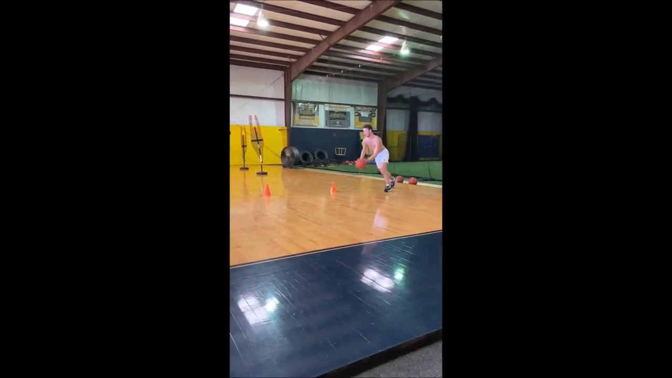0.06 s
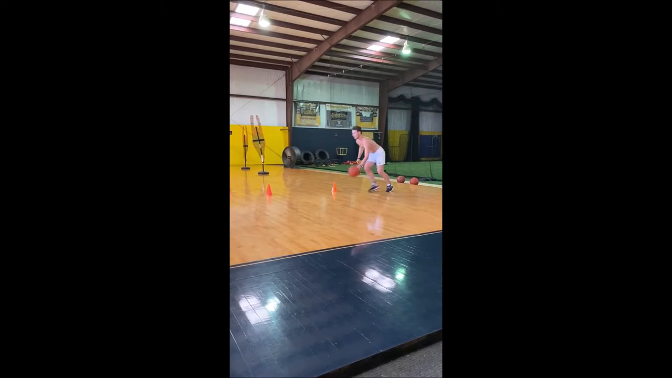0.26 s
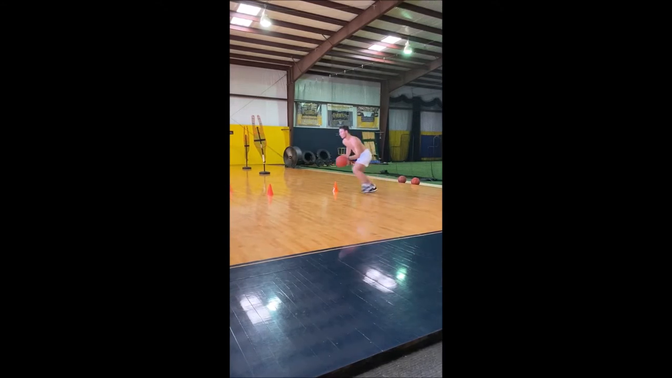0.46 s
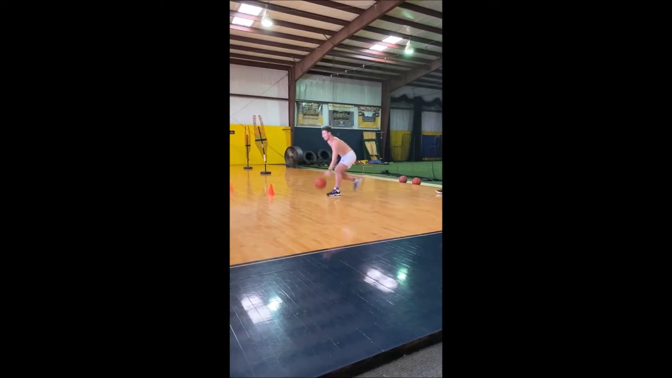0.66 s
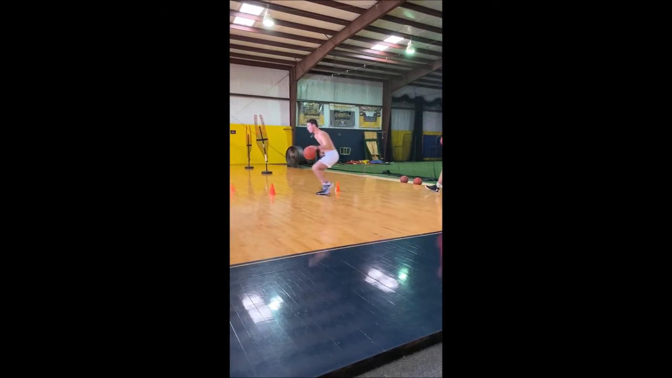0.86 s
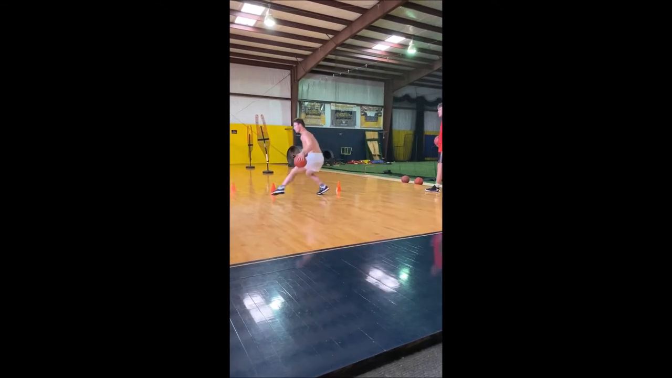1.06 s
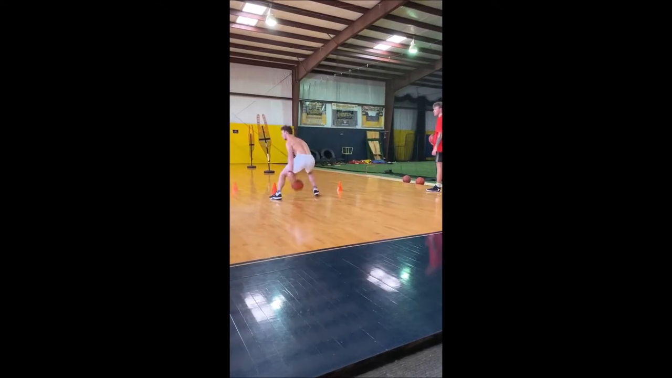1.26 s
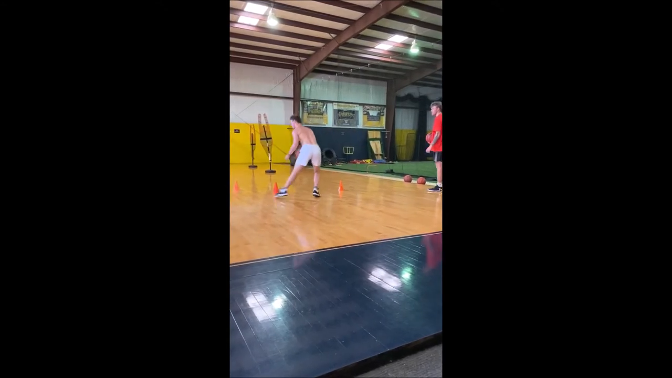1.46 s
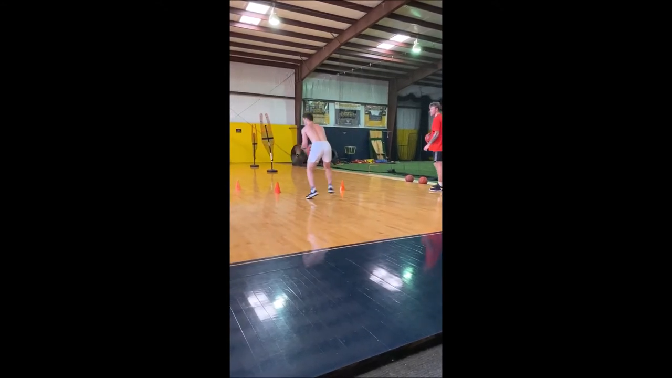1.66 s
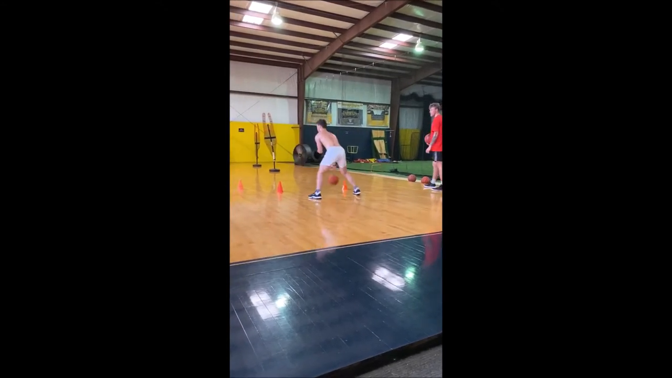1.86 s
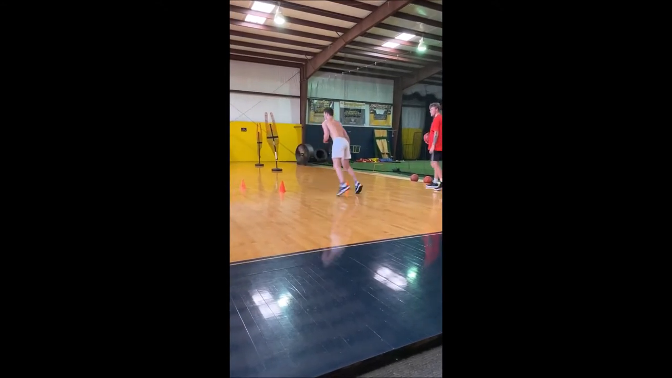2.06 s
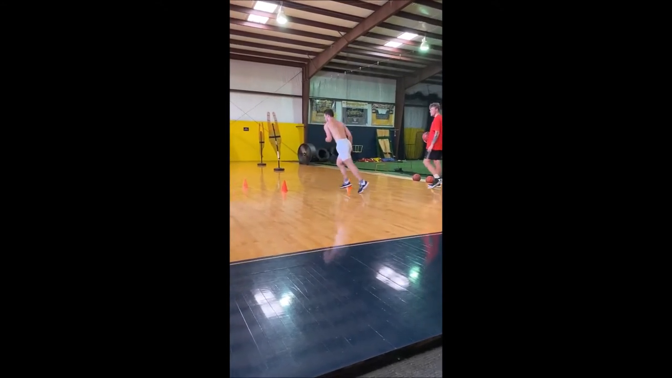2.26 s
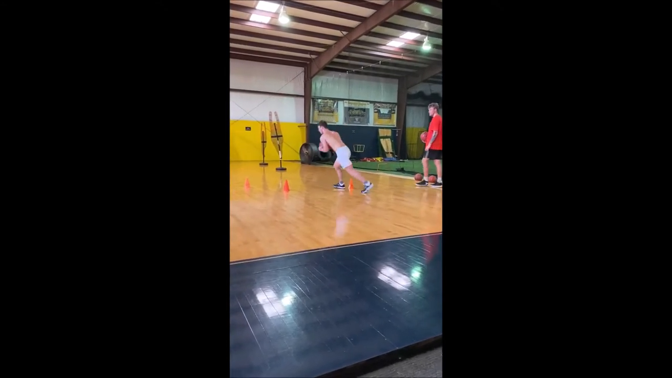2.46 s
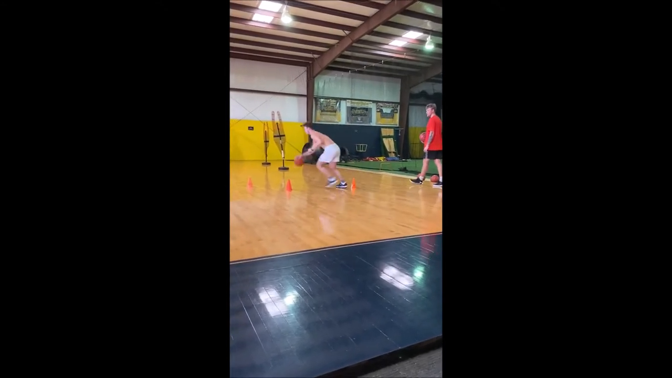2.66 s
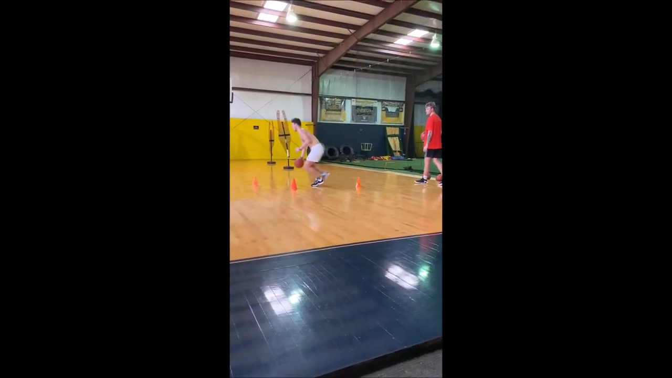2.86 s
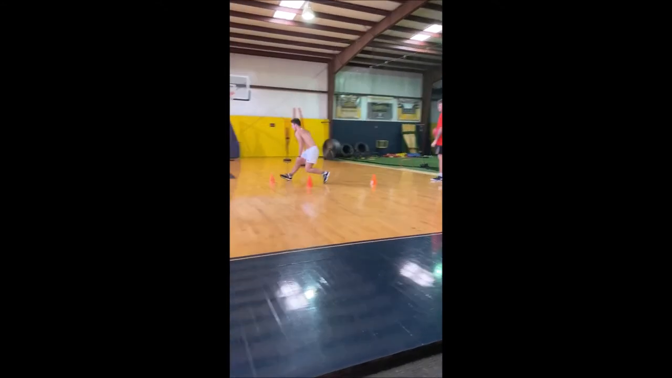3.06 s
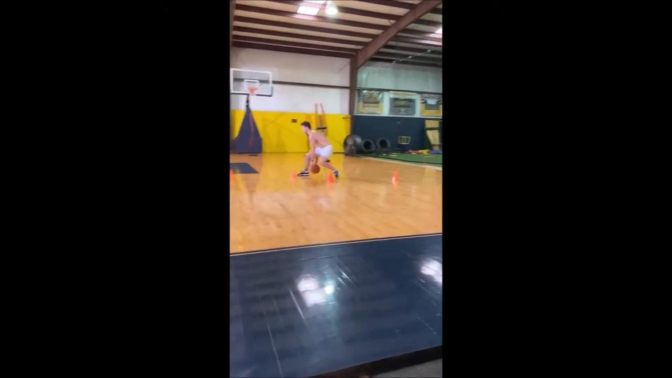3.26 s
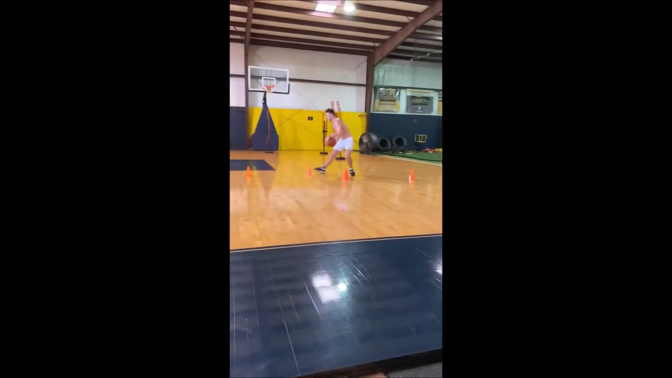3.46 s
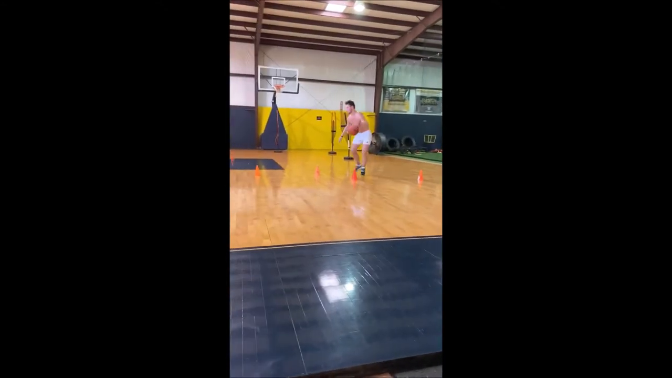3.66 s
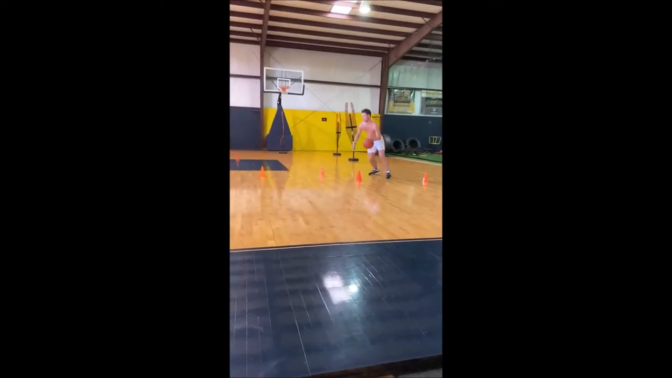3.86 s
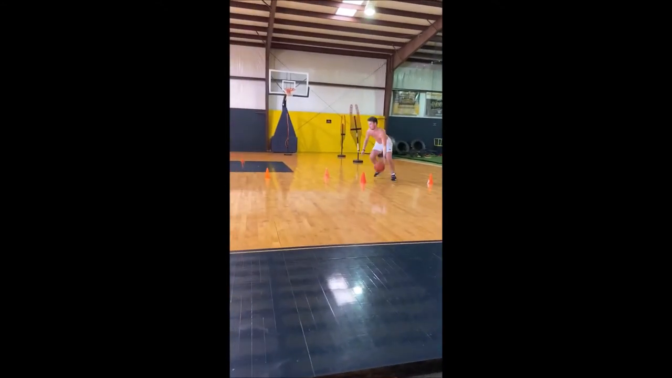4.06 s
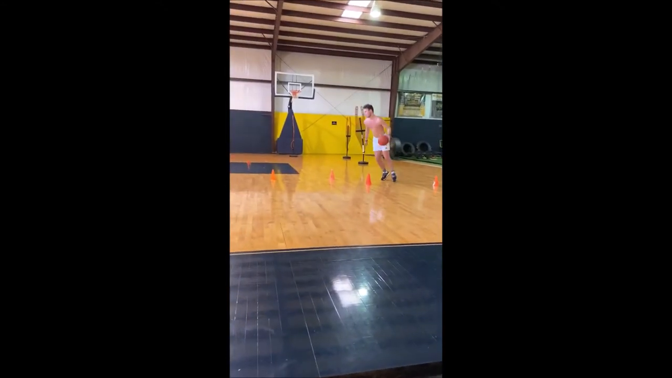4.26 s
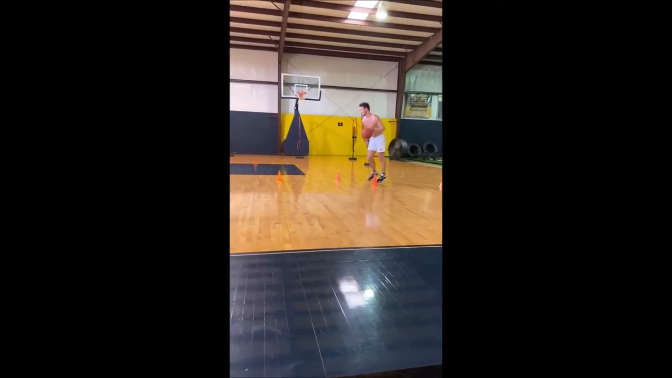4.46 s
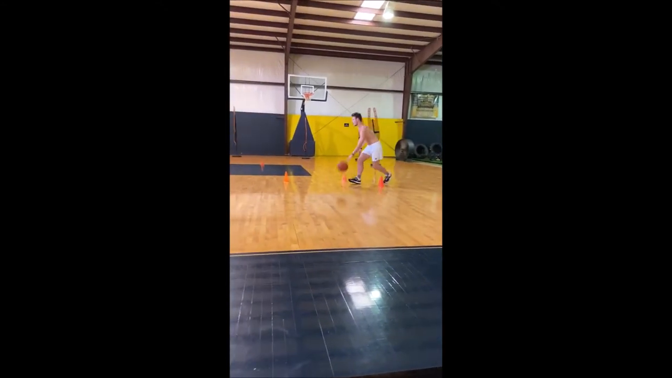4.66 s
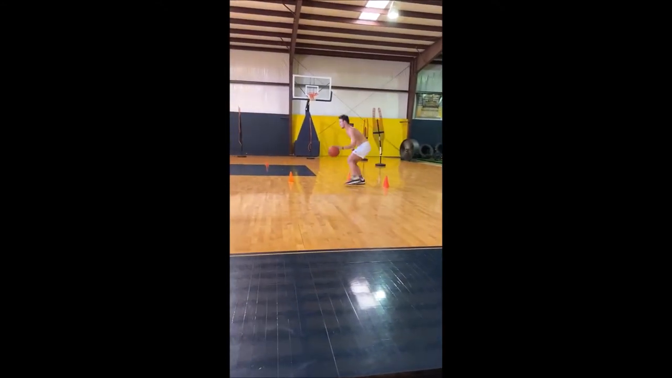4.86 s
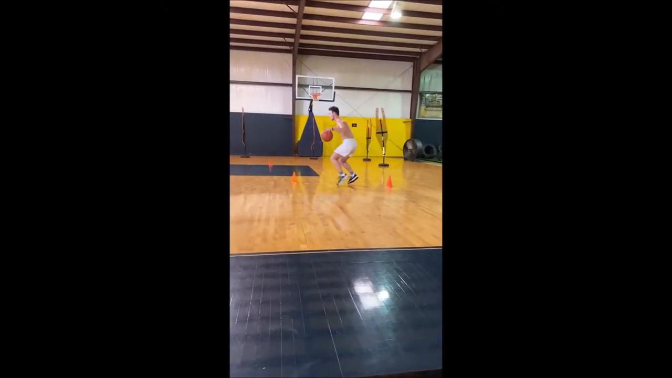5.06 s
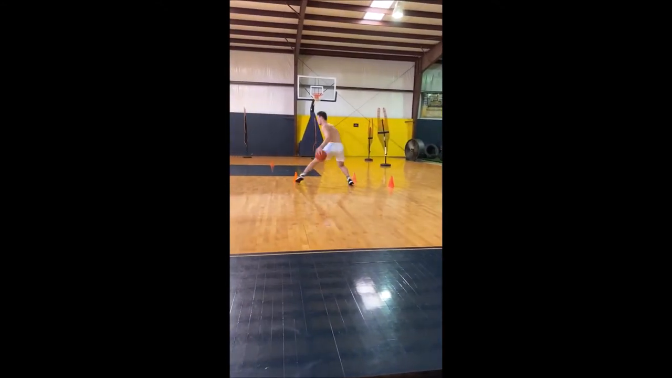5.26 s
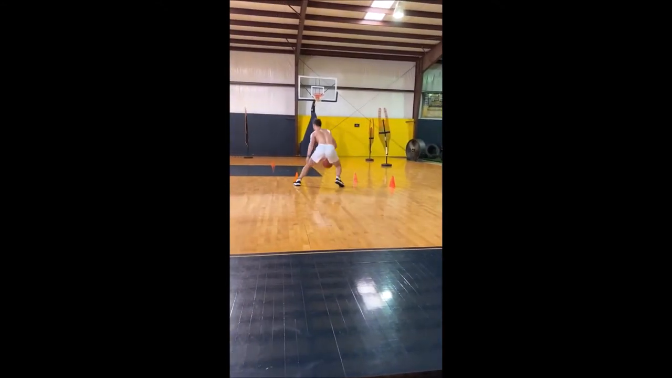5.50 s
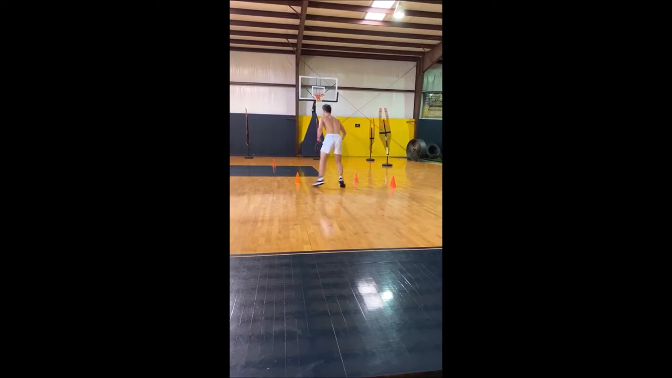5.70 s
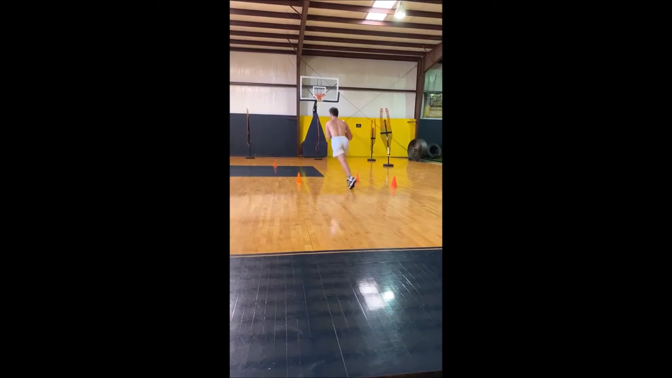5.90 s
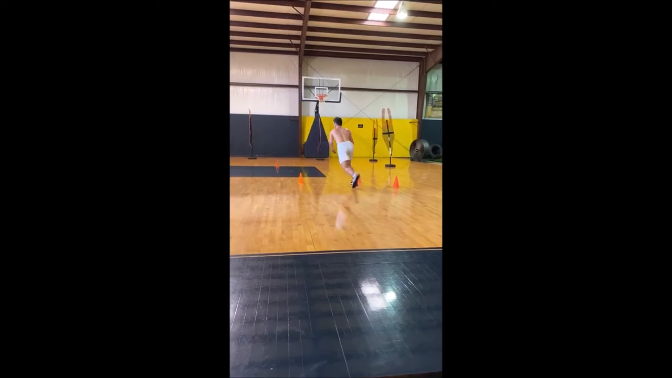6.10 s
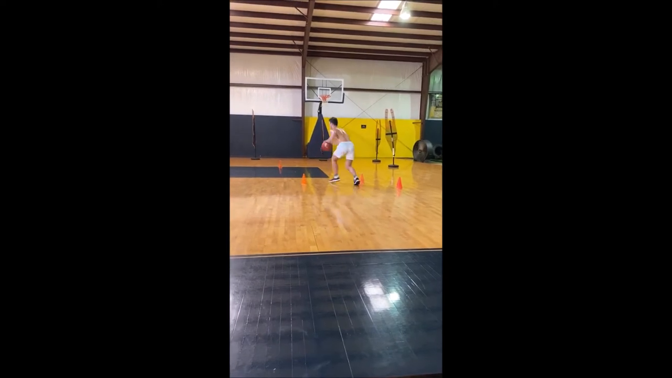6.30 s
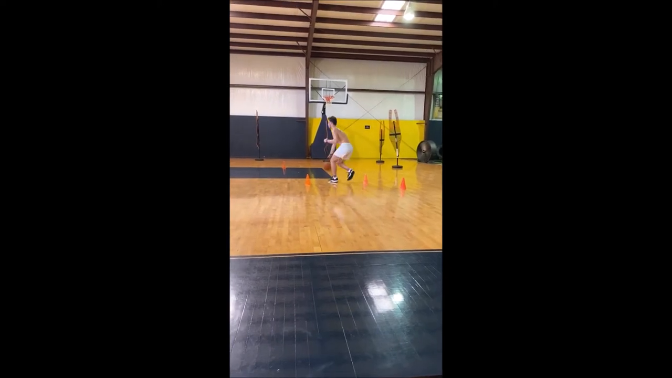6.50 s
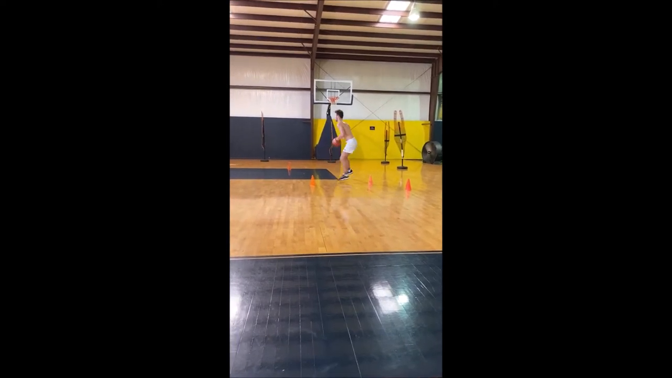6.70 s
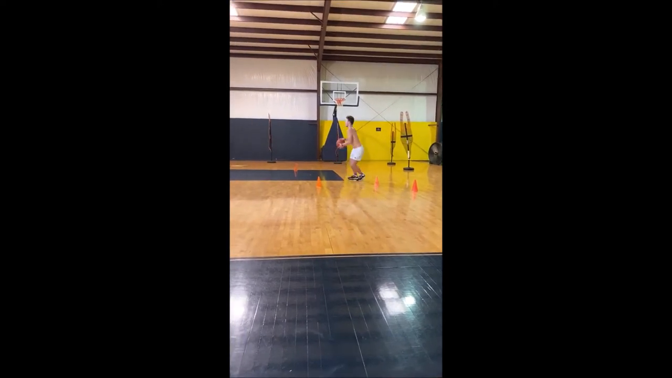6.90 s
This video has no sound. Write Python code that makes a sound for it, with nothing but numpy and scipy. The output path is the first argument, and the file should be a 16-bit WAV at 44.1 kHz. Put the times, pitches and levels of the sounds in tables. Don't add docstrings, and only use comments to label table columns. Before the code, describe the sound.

Sharp, ringing basketball dribbles about every half second or so, rubber soles chirping and scuffing, in a large reverberant gym with constant low fan noise.

```python
import sys
import numpy as np
from scipy import signal
from scipy.fft import rfft, irfft, next_fast_len
from scipy.io import wavfile
from scipy.ndimage import uniform_filter1d

SR = 44100
rng = np.random.default_rng(int(sys.argv[2]) if len(sys.argv) > 2 else 0)


def digitize_waveform(pressure):
    field = np.atleast_2d(pressure).T
    bounded = np.clip(field, -1, 1)
    quanta = np.round(bounded * 32767).astype(np.int16)
    wavfile.write(sys.argv[1], SR, quanta)


def convert_level_to_amplitude(level_db):
    exponent = np.asarray(level_db, float) / 20
    return 10 ** exponent


N = 306036
SIZE = next_fast_len(N + 2 * SR)
BINS = np.maximum(np.fft.rfftfreq(SIZE, 1 / SR), 1)

# (time [s], slap peak [dB], ball ring [dB], floor boom [dB], hardness [dB, higher is
BOUNCES = [(0.1901, -13, -22.5, -15.5, -2.5), (0.637, -12.5, -19.5, -14.5, -1.5),
           (1.2504, -15.5, -23, -20, 0), (1.853, -10.5, -27, -16.5, 2), (2.7927, -21.5, -17.5, -22, -2),
           (3.119, -25, -28, -20.5, -4), (3.26, -20.5, -25.5, -19.5, 5), (4.0361, -13.5, -21.5, -15, 8),
           (4.7426, -16.5, -20, -14.5, 0), (5.4206, -18.5, -20, -18, -3), (6.479, -13, -21.5, -14.5, 4)]


def at_hz(points, hz):
    table_hz, values = np.transpose(points)
    return np.interp(np.log(hz), np.log(table_hz), values)


def drift(rate, size=N):
    knots = rng.standard_normal(int(size / SR * 8000) + 2)
    r = np.exp(-2 * np.pi * rate / 8000)
    slow = signal.lfilter([1], [1, -2 * r, r * r], np.tile(knots, 2))[len(knots):]
    slow_unit = (slow - slow.mean()) / slow.std()
    return np.interp(np.linspace(0, len(slow) - 1, size), np.arange(len(slow)), slow_unit)


def bands():
    edges = 20 * 2 ** np.arange(0, 10.1, 0.5)
    return [(np.sqrt(low * high), signal.butter(2, [low, high], "band", fs=SR, output="sos"))
            for low, high in zip(edges, edges[1:])]


def causal(db):
    folded = irfft(np.log(convert_level_to_amplitude(db)), SIZE)
    folded[1:SIZE // 2] *= 2
    folded[SIZE // 2 + 1:] = 0
    return np.exp(rfft(folded))


def ring(strikes, hz, t60):
    r, w = convert_level_to_amplitude(-60 / (t60 * SR)), 2 * np.pi * hz / SR
    return signal.lfilter([0, np.sin(w)], [1, -2 * r * np.cos(w), r * r], strikes + 1e-18)


def clicks(times, db):
    out = np.zeros(N)
    out[(np.asarray(times) * SR).astype(int)] = convert_level_to_amplitude(db)
    return out


def slaps(times, db, hard_db, t60):
    # (frequency [Hz], level [dB])
    slap_colour = [(300, -42.5), (900, 25.5), (2000, 17.5), (4500, 7.5), (7000, 6), (10000, 1.5),
                   (16000, -6)]
    t = np.arange(400) / SR
    out = np.zeros(N + len(t))
    grits = rng.standard_normal((len(times), len(t)))
    for s, level_db, edge_db, grit in zip(times, db, hard_db, grits):
        burst = 0.49 * grit * convert_level_to_amplitude(-60 * t / t60) * np.minimum(t / 0.00031, 1)
        burst[20:23] += [1, 0.4, -0.9]
        spectrum = rfft(burst)
        burst = irfft(spectrum / uniform_filter1d(np.abs(spectrum), size=3), len(t)) * convert_level_to_amplitude(-4 * t / t60)
        dull = np.exp(-2 * np.pi * 14000 * convert_level_to_amplitude(2 * edge_db) / SR)
        burst = signal.lfilter([1], [1, -dull], burst)
        start = int(s * SR)
        out[start:start + len(t)] += convert_level_to_amplitude(level_db) * burst / np.abs(burst).max()
    return irfft(rfft(out, SIZE) * causal(at_hz(slap_colour, BINS)), SIZE)[:N]


def fans():
    # (frequency [Hz], level [dB per Hz])
    roar = [(25, -61), (58, -52), (200, -53), (380, -54), (540, -61.5), (700, -58.5), (1000, -60.5),
            (1500, -69.5), (2500, -76), (4500, -82.5), (8000, -93), (12000, -101), (15500, -103),
            (16000, -125)]
    # (frequency [Hz], level [dB])
    whine = [(60, -37), (6450, -70.5), (8950, -69), (10450, -95)]
    t = np.arange(N) / SR
    surge_db = 0.4 * drift(1.08)
    noise = rfft(rng.standard_normal((2, 2, SIZE)))
    air = irfft(noise * convert_level_to_amplitude(at_hz(roar, BINS)) * np.sqrt(SR / 2), SIZE)[..., :N]
    out = sum(convert_level_to_amplitude(db + 1.5) * np.sin(2 * np.pi * hz * t) for hz, db in whine)
    for k, (hz, sos) in enumerate(bands()):
        out = out + signal.sosfilt(sos, air[k % 2]) * convert_level_to_amplitude(surge_db + 1.45 * drift(9.8))
    return out


def ball():
    # (frequency [Hz], level [dB], t60 [s])
    air_modes = [(894, -8, 0.16), (977, 2, 0.061), (1198, -3.5, 0.037), (1520, -3, 0.027),
                 (1624, -18, 0.053), (2020, -19, 0.03), (2690, -8, 0.02)]
    s, slap_db, ring_db, boom_db, hard_db = np.transpose(BOUNCES)
    shares_db = 0.54 * rng.standard_normal((len(s), len(air_modes)))
    out = slaps(s, slap_db + 4.0, hard_db, t60=0.005)
    for (hz, db, t60), share_db in zip(air_modes, shares_db.T):
        out = out + ring(clicks(s + 0.001178, ring_db + db + 5.0 + share_db), hz, t60)
    return out


def boards():
    # (frequency [Hz], level [dB], t60 [s])
    floor_modes = [(56.74, -6.5, 0.79), (91, -2, 0.13), (120, -1.5, 0.24), (173.2, 1.5, 0.15),
                   (220, 0.5, 0.14)]
    # (time [s], level [dB], pitch [Hz])
    heels = [
        (.78, -24, 76.7),
        (1.97, -25, 84.3),
        (3.284, -35, 62.4),
        (4.161, -33, 70.4),
        (4.92, -31, 59.4),
        (6.371, -44, 69.4),
    ]
    s, slap_db, ring_db, boom_db, hard_db = np.transpose(BOUNCES)
    shares_db = np.clip(2.0 * rng.standard_normal((len(s), len(floor_modes))), -6, 3)
    ringing = np.zeros(N)
    for (hz, db, t60), share_db in zip(floor_modes, shares_db.T):
        arrival = s + 0.00542 + 1.085 / hz
        ringing += ring(clicks(arrival, boom_db + db + 4.0 + share_db), hz, t60)
    soft = np.exp(-2 * np.pi * 120 / SR)
    out = signal.lfilter([1 - soft], [1, -soft], ringing)

    panel_hz = 64.15
    t = np.arange(int(0.2 * SR)) / SR
    shape = (1 - np.exp(-(t / 0.0097) ** 2)) * np.exp(-(t / 0.052) ** 2)
    for time, db, hz in [*zip(s, boom_db, [panel_hz] * len(s)), *heels]:
        sinking_hz = hz * (1 + 5.2 * np.exp(-t / 0.006))
        phase = 2 * np.pi * np.cumsum(sinking_hz) / SR - 1.5
        start = int(time * SR)
        out[start:start + len(t)] += convert_level_to_amplitude(db + 3.0) * shape * np.cos(phase)
    return out


def soles():
    # (time [s], length [s], slip rate [Hz], level [dB], overtone step [dB])
    squeaks = [
        (0.317, 0.016, 3305, -28, -8.5),
        (2.767, 0.0087, 3990, -28, -20),
        (3.14, 0.028, 4870, -42, -28),
        (3.867, 0.012, 4480, -33, -12),
        (4.921, 0.016, 3350, -19.5, -6),
        (4.95, 0.018, 4460, -19.5, -23),
        (6.335, 0.043, 1800, -34, -25),
        (6.356, 0.021, 3807, -28.5, -5.5),
        (6.373, 0.021, 3830, -21, -12.5),
        (6.431, 0.03, 4026, -32, -6.5),
    ]
    # (time [s], length [s], slip rate [Hz], level [dB], overtone step [dB])
    scuffs = [
        (0.314, 0.0183, 3497, -31.5, -7),
        (2.771, 0.0086, 3910, -32.5, -15),
        (0.825, 0.017, 4376, -19.5, -12.5),
        (.826, 0.019, 4830, -38, -18),
        (0.84, 0.0167, 4147, -19, -10),
        (2.826, 0.022, 3950, -32, -15.5),
        (4.912, 0.023, 4450, -27, -5),
        (4.931, 0.032, 4130, -23.5, -12),
        (6.453, 0.03, 4210, -28.5, -18),
    ]
    # (time [s], peak [dB])
    contacts = [(0.4375, -40), (0.46, -34), (0.5032, -36), (0.602, -40), (0.7038, -38), (1.1122, -29.5),
                (1.597, -37), (1.883, -38), (3.1399, -30), (4.0971, -27), (4.766, -22), (5.4896, -30),
                (6.0494, -37.5), (6.498, -23), (6.5443, -20), (6.6057, -30)]
    # (frequency [Hz], level [dB])
    rubber = [(1500, -3.5), (5200, -0.5), (6600, 4), (8200, 0.5), (11500, -1), (13500, -6), (16000, -4)]
    ticks = slaps(*np.transpose(contacts), [-3.5] * len(contacts), t60=0.0068)
    out = np.zeros(N)
    scuff_band = signal.butter(2, [3000, 11000], "band", fs=SR, output="sos")
    slips = [(*row, 0.25) for row in squeaks] + [(*row, 0.623) for row in scuffs]
    for s, length, hz, db, step_db, rough in slips:
        size = int(length * SR)
        wander = 0.07 * drift(200, size=2000)[:size] + 0.09 * drift(900, size=2000)[:size]
        rise = 0.062 * np.linspace(-0.5, 0.5, size)
        phase = 2 * np.pi * np.cumsum(hz * (1 + rough * wander + rise)) / SR
        tone = sum(convert_level_to_amplitude(k * step_db) * np.sin((k + 1) * phase) * ((k + 1) * hz < 0.4 * SR) for k in range(4))
        hiss = signal.sosfilt(scuff_band, rng.standard_normal(size=2000))[:size]
        scuff = convert_level_to_amplitude(-17.0) * rough * hiss
        flutter_db = 10 * rough * np.tanh(drift(360, size=2000)[:size])
        shape = signal.windows.tukey(size, 0.5) * convert_level_to_amplitude(flutter_db)
        start = int(s * SR)
        out[start:start + size] += convert_level_to_amplitude(db + 5.0) * (tone + scuff) * shape
    return ticks + irfft(rfft(out, SIZE) * causal(at_hz(rubber, BINS)), SIZE)[:N]


def chirp():
    # (time [s], slip rate [Hz], level [dB])
    glide = [
        (1.381, 4920, -50),
        (1.387, 4780, -35),
        (1.392, 4690, -21),
        (1.399, 4750, -28),
        (1.405, 4930, -40),
        (1.413, 5125, -31),
        (1.421, 5030, -46),
        (1.426, 5000, -56),
    ]
    s, hz, db = np.transpose(glide)
    t = np.arange(N) / SR
    phase = 2 * np.pi * np.cumsum(np.interp(t, s, hz)) / SR
    level_db = np.interp(t, s, db, -200, -200) + 7
    return convert_level_to_amplitude(level_db) * (np.sin(phase) + convert_level_to_amplitude(-33.5) * np.sin(2 * phase))


def hall(x):
    # (frequency [Hz], t60 [s])
    decay = [(60, 1.26), (250, 0.81), (1000, 1.08), (2500, 1.6), (4500, 1.42), (8000, 0.8), (12000, 0.57)]
    # (delay [s], level [dB])
    echoes = [(.0055, -12.5), (.014, -14), (.022, -15), (.030, -21), (.043, -46), (.062, -34.5),
              (.069, -15)]
    tail_db, scatter_db, scatter_t60 = -3.5, -2, 0.33
    t = np.arange(int(1.5 * SR)) / SR
    unit = np.sqrt(0.08 * SR)
    white = rng.standard_normal((2, 2, len(t)))
    tail = sum(signal.sosfilt(sos, white[k % 2]) * convert_level_to_amplitude(-60 * t / at_hz(decay, hz))
               for k, (hz, sos) in enumerate(bands()))
    tail = tail * (1 - np.exp(-t / 0.0075)) * convert_level_to_amplitude(tail_db) / unit
    early = convert_level_to_amplitude(scatter_db - 60 * t / scatter_t60) * rng.standard_normal((2, len(t))) / unit
    for delay, db in echoes:
        early[:, int(delay * SR)] += convert_level_to_amplitude(db)
    dull = signal.butter(2, [300, 6700], "band", fs=SR, output="sos")
    response = tail + signal.sosfilt(dull, early)
    return irfft(rfft(response, SIZE) * rfft(x, SIZE), SIZE)[:, :N]


def scene():
    # (frequency [Hz], likeness [0-1])
    likeness = [(60, .999), (130, .995), (290, .985), (450, .9), (640, .45), (2000, .2), (2800, .6),
                (3600, .25), (5000, .4), (6500, .93), (8500, .93), (15000, .88)]
    bounce, boom, shoes, near = ball(), boards(), soles(), chirp()
    sent = shoes + convert_level_to_amplitude(-2.5) * bounce + convert_level_to_amplitude(-2) * boom + convert_level_to_amplitude(-14) * near
    first, second = rfft(hall(sent) + fans(), SIZE)
    alike = np.clip(at_hz(likeness, BINS), 0, 1)
    other = alike * first + np.sqrt(1 - alike ** 2) * second
    diffuse = irfft([first, other], SIZE)[:, :N]
    return bounce + boom + convert_level_to_amplitude(-2.0) * shoes + near + diffuse


def roll_off(x):
    return signal.sosfilt(signal.butter(12, 17170, fs=SR, output="sos"), x)


def record(dry):
    # (frequency [Hz], level [dB])
    left_louder = [(110, 0), (200, 1), (380, 2), (600, 4), (800, 8.5), (1290, 5), (2200, -.5), (3000, 0),
                   (16000, 0)]
    # (frequency [Hz], phase [radians])
    right_lag = [(0, 0), (300, .08), (700, 1.2), (2500, 1.8), (4000, .9), (4700, 1.5), (5300, .9),
                 (7400, 3.14), (16500, 12.5)]
    lag = np.interp(BINS, *np.transpose(right_lag))
    shadow = convert_level_to_amplitude(-at_hz(left_louder, BINS)) * np.exp(-1j * lag)
    right = irfft(rfft(dry[1], SIZE) * shadow, SIZE)[:N]
    ports = signal.sosfilt(signal.butter(3, 45, "high", fs=SR, output="sos"), [dry[0], right])
    ports = signal.sosfilt(signal.cheby2(8, 40, 16700, fs=SR, output="sos"), ports)
    mix = 0.8 * np.tanh(ports / 0.82)
    return roll_off(mix)


dry = scene()
out = record(dry)
digitize_waveform(out)
```